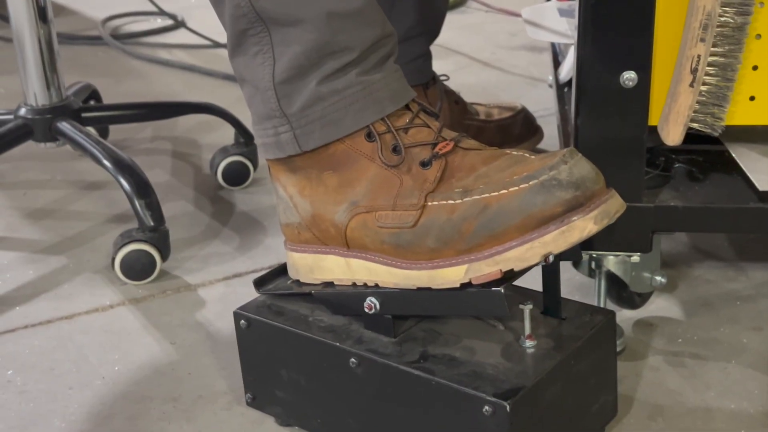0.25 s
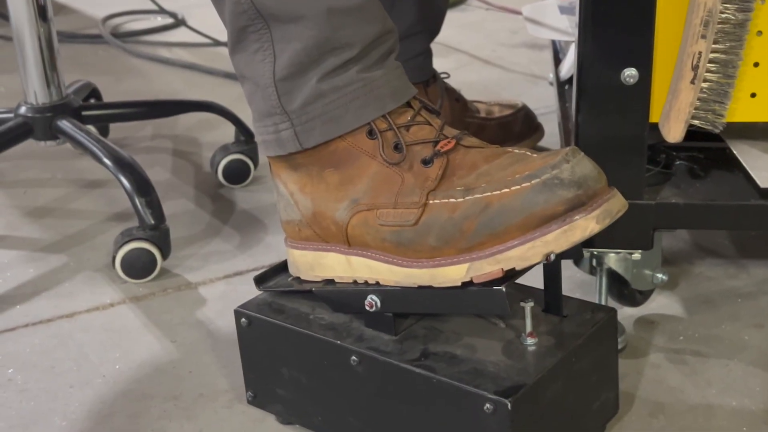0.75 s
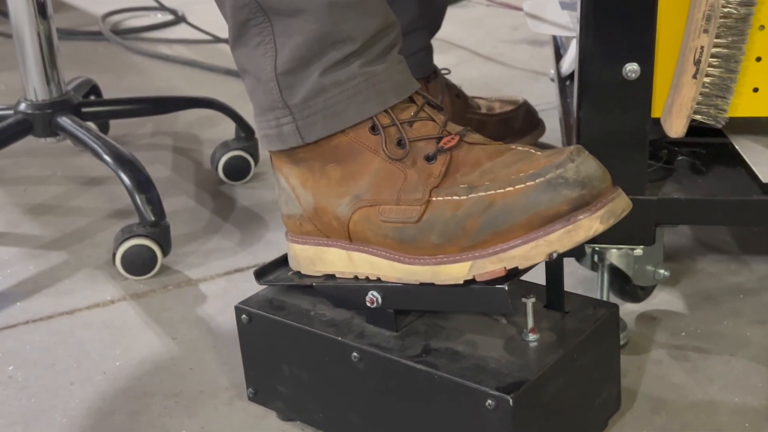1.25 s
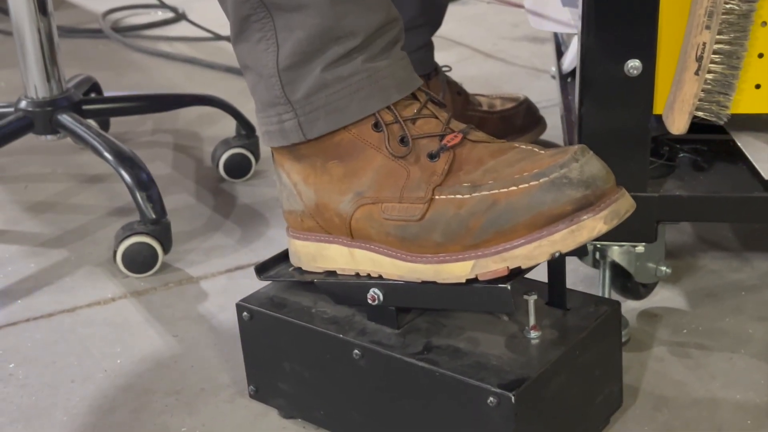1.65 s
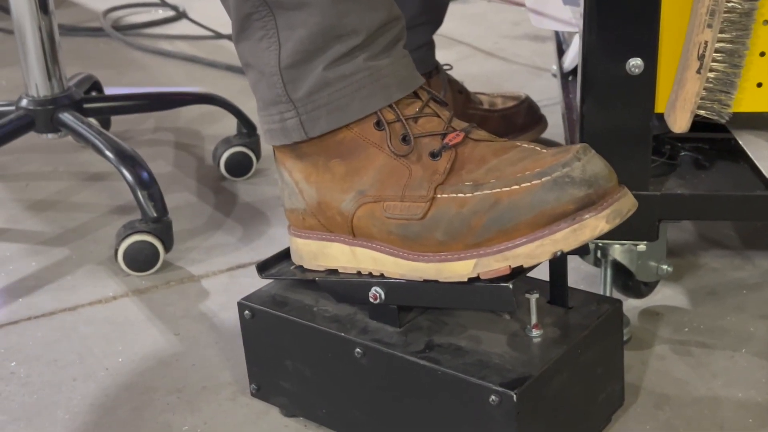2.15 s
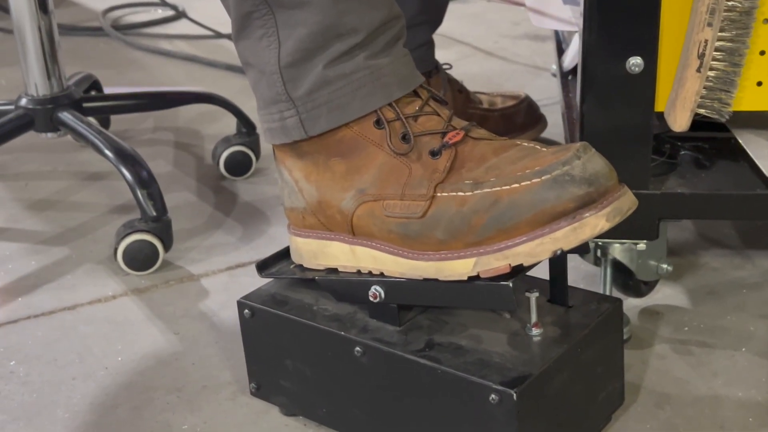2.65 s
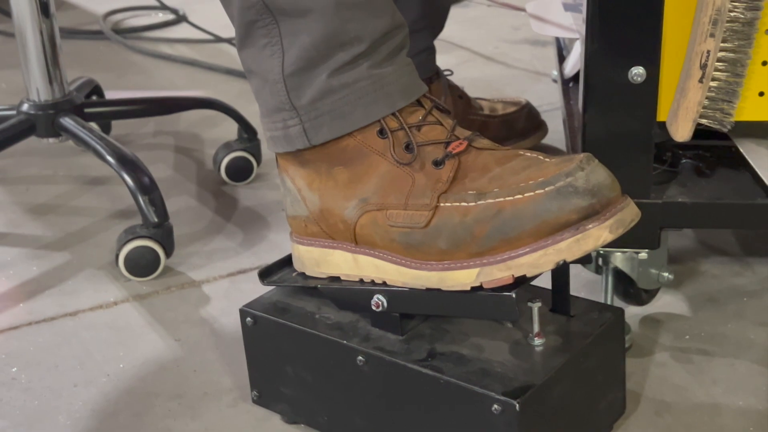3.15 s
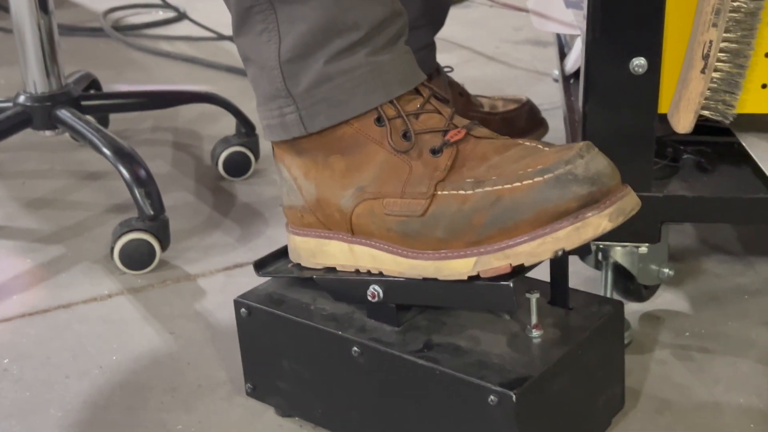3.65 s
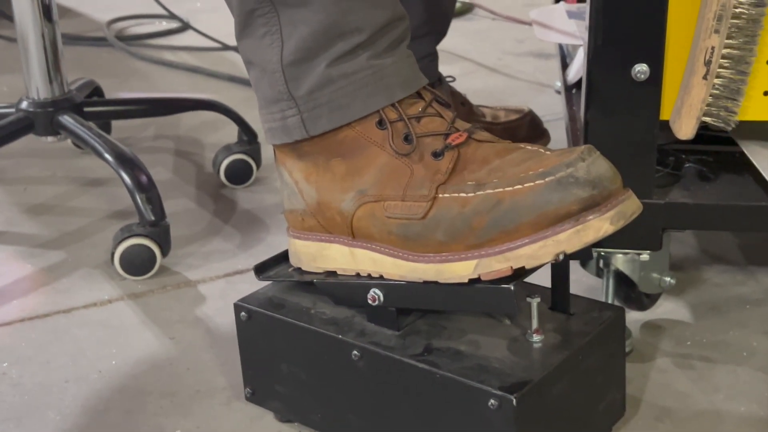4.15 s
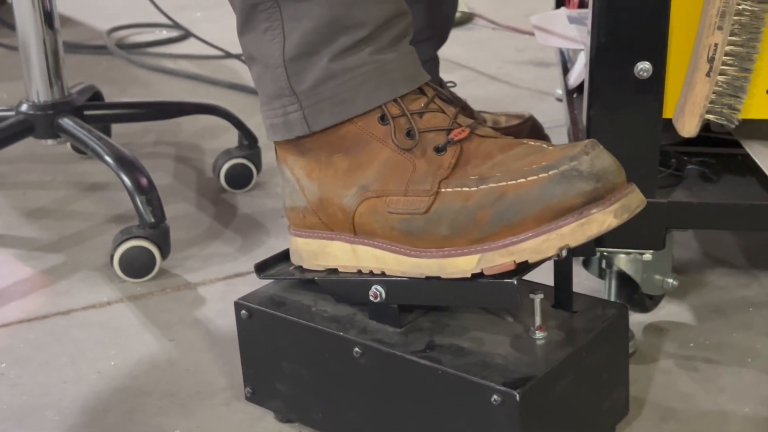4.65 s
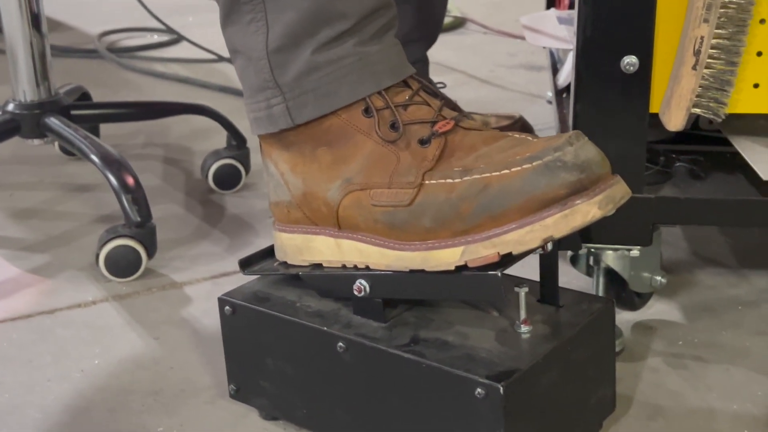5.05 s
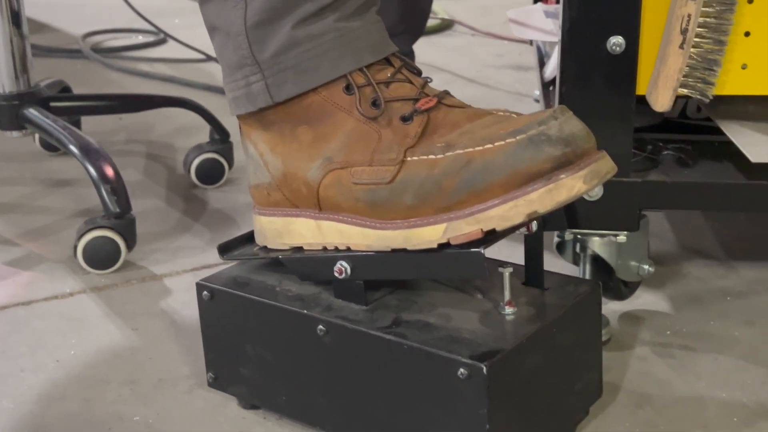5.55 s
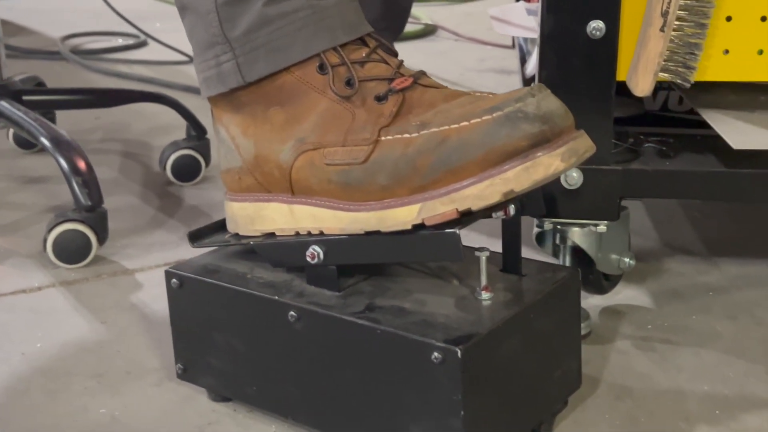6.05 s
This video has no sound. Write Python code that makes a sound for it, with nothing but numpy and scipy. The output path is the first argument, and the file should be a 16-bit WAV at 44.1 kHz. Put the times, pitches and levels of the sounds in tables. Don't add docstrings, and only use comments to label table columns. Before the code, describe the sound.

A welding arc snaps and pops through failed strikes, then catches and holds as a harsh, steady electric buzz over a fan hum.

```python
import sys
import numpy as np
from scipy import signal
from scipy.fft import rfft, irfft, next_fast_len
from scipy.io import wavfile
from scipy.ndimage import uniform_filter1d

SR = 44100
rng = np.random.default_rng(int(sys.argv[2]) if len(sys.argv) > 2 else 0)


def wav_record(signal):
    frames = np.transpose(np.atleast_2d(signal))
    bounded = np.clip(frames, -1, 1)
    quanta = np.round(bounded * 32767).astype(np.int16)
    wavfile.write(sys.argv[1], SR, quanta)


def elevation(decibels):
    levels = np.asarray(decibels, float)
    return 10 ** (levels / 20)


N = 278271
TIME = np.arange(N) / SR
EDGE_SHARE = 0.28
REPEAT_DB = -2
OFF_PLACE_DB = -7

# (frequency [Hz], left minus right [dB])
BALANCE = [(600, -3.5), (1500, 0), (2800, -5), (4200, 4), (7000, 12), (10000, 1.5)]


def level(x, db):
    return x * elevation(db) / np.sqrt(np.mean(x ** 2))


def at(table, hz):
    f, db = np.transpose(table)
    return np.interp(np.log(np.maximum(hz, 1)), np.log(f), db)


def shape(x, response):
    size = next_fast_len(N + SR // 2)
    hz = np.arange(size // 2 + 1) * SR / size
    return irfft(rfft(x, size) * response(hz), size)[..., :N]


def walk(rate):
    k = int(SR / rate)
    steps = np.repeat(rng.standard_normal(N // k + 1), k)
    return level(uniform_filter1d(uniform_filter1d(steps, k), k)[:N], 0)


def delayed(hz, ms):
    return np.exp(-2j * np.pi * hz * ms / 1000)


def fan(db=-38):
    # (frequency [Hz], level per Hz [dB])
    rush_colour = [(12, -58), (20, -21), (101, -8), (133, -4), (207, -10.5), (238, -6), (306, -17.5),
                   (491, -19.5), (597, -27.5), (725, -22), (1300, -28.5), (5690, -38.5), (7730, -36.5),
                   (11500, -56), (15700, -55), (16000, -85)]
    # (frequency [Hz], difference minus sum [dB])
    rush_width = [(25, -16), (60, -10), (110, -23), (200, -2), (380, -4.5), (700, 1), (2380, 3), (8120, -3),
                  (14000, 6), (15000, -18)]
    # (frequency [Hz], width [Hz], level [dB])
    tones = [(33, 4.8, -58), (63.1, 5.5, -49.5), (136.8, 3.94, -46), (186.2, 4.5, -42), (234.6, 2.01, -36),
             (279, 9.1, -50.5), (348, 8.7, -57), (697, 7.4, -56.5)]
    mid, side = rng.standard_normal((2, N))
    mid = shape(mid, lambda f: elevation(at(rush_colour, f)))
    side = shape(side, lambda f: elevation(at(rush_colour, f) + at(rush_width, f)))
    out = level(np.array([mid + side, mid - side]), db)
    for hz, width, tone_db in tones:
        turn = 2 * np.pi * np.cumsum(hz + 0.3105 * width * walk(6)) / SR
        swing = elevation(tone_db + 1 + 0.12 * width * walk(3.7))
        out = out + swing * np.sin(turn + np.array([[0], [0.3]]))
    return out


def paths(hz):
    # (delay [ms], left [dB], right [dB])
    echoes = [(.7, -9, -7), (1.4, -17, -18), (2.3, -13, -6), (5.8, -18, -18), (7.5, -19, -16),
              (11.1, -15, -9)]
    ms, *db = np.transpose(echoes)
    near = 1 + elevation(np.array(db)) @ np.exp(-2j * np.pi * np.outer(ms / 1000, hz))
    lean = elevation(at(BALANCE, hz) / 2)
    return near * [lean * delayed(hz, -0.3407), 1 / lean]


def coloured(pair, hz, echo_db=REPEAT_DB):
    # (frequency [Hz], level [dB])
    sum_colour = [(850, -22), (1150, -4.5), (1450, -9), (2100, 0.5), (3900, -8), (6300, -11), (8500, -16.5),
                  (11500, -21), (15700, -15.5), (16100, -80)]
    # (frequency [Hz], level [dB])
    difference_colour = [(400, -23), (850, -22), (1500, -15.5), (2200, -1), (4200, -10), (6900, -11.5),
                         (8500, -14.5), (12500, -21.5), (14300, -5.5), (15000, -43)]
    left, right = pair * (1 + elevation(echo_db) * delayed(hz, 1.753))
    mid = (left + right) * elevation(at(sum_colour, hz)) / 2
    return mid, (left - right) * elevation(at(difference_colour, hz)) / 2


def hiss(gate, side_db=-1, alike=0.16, echo_db=REPEAT_DB):
    # (frequency [Hz], level against the buzz colour [dB])
    hiss_colour = [(300, -17), (1000, 1.5), (2500, 1.5), (5000, 8.5), (8000, 18.5), (11000, 18.5),
                   (16000, 16.5)]
    own = rng.standard_normal((3, N)) * gate
    size = next_fast_len(N)
    hz = np.arange(size // 2 + 1) * SR / size
    near, *far = rfft(own, size)
    pair = alike * near * paths(hz) + np.sqrt(1 - alike ** 2) * np.array(far)
    mid, side = coloured(pair, hz, echo_db)
    side = elevation(side_db) * side
    return irfft(np.array([mid + side, mid - side]) * elevation(at(hiss_colour, hz)), size)[:, :N]


def tries():
    # (time [s], tries [count], peak [dB], spark over the pop [dB])
    dull = [(0.4448, 1, -14, -23), (0.4765, 1, -14, -30), (0.5292, 2, -13, -26.5), (0.6987, 1, -15, -27),
            (0.7899, 1, -13, -26), (0.9073, 1, -13.5, -28), (0.9417, 1, -13, -23), (0.9759, 2, -13, -25),
            (1.0282, 2, -13.5, -24), (1.1248, 1, -12, -25), (1.1945, 1, -14.5, -25), (1.244, 2, -13, -24),
            (1.3156, 1, -13, -25), (1.3335, 1, -12.5, -28), (1.4495, 1, -12.5, -43),
            (1.5855, 1, -12.5, -25)]
    # (time [s], tries [count], peak [dB], spark over the pop [dB])
    snaps = [
        (0.5952, 5, -10.5, -37),
        (0.7342, 2, -9, -30),
        (0.8385, 3, -10, -32),
        (1.1426, 1, -12, -27),
        (1.16, 1, -8, -30),
        (1.431, 1, -10, -23),
        (1.5165, 1, -13.5, -19),
    ]
    # (time [s], tries [count], peak [dB], spark over the pop [dB])
    catches = [
        (0.6817, 1, -18, -15.5),
        (0.7679, 1, -17, -15.5),
        (0.889, 1, -24, -17),
        (1.6135, 1, -23, -23),
    ]
    retry_s, retry_spark_db = 0.0173, -6
    runs = []
    for table, hz in ((dull, 1100), (snaps, 2730), (catches, 920)):
        for s, count, db, spark_db in table:
            for k in range(count):
                runs.append((s + k * retry_s, db, hz, spark_db + k * retry_spark_db))
    return sorted(runs)


def pop(hz, spark_db, grit):
    t = np.arange(300) / SR
    turn = (t - 0.0015) * (1170 + 0.42 * hz)

    def lobe(centre, width):
        return np.exp(-((turn - centre) / width) ** 2)

    gas = 0.8 * lobe(-0.4, 0.2) - 1.455 * lobe(0, 0.22) + 720 / hz * lobe(0.73, 0.38)
    ring = signal.butter(2, [0.78 * 14000, 1.3 * 14000], "band", fs=SR)
    grit = grit * elevation(-9) + 2 * signal.lfilter(*ring, grit)
    grit = grit * (t > 0.0007) * np.exp(-(t - 0.0007) / 0.0026)
    return gas + elevation(spark_db + 13) * grit


def pop_paths(hz):
    # (delay [ms], left [dB], right [dB])
    dull_echoes = [(2.24, -15, -1.5), (4.6, -11, -13)]
    ms, *db = np.transpose(dull_echoes)
    cup = 1 + elevation(-18) * delayed(hz, 0.72) / (1 + (hz / 1700) ** 4)
    echoes = elevation(np.array(db)) @ np.exp(-2j * np.pi * np.outer(ms / 1000, hz))
    near = 1 - echoes / (1 + (hz / 1960) ** 4)
    lean = elevation(at(BALANCE, hz) / 4)
    return cup * near * [lean * delayed(hz, 0.069), 1 / lean]


def workshop_tail(dry, room_db=-33, t60=0.34):
    tail = np.arange(SR // 2) / SR
    fade = np.exp(-np.log(1000) * tail / t60) * np.minimum(tail / 0.0017, 1)
    room = rng.standard_normal((2, len(tail))) * fade
    return elevation(room_db) * signal.fftconvolve(dry[None], room, axes=1)[:, :N]


def stutter():
    # (peak time [s], hiss [dB], rise [s])
    swells = [
        (0.447, -34, .005),
        (0.61, -31, 0.018),
        (0.684, -29.5, 0.009),
        (0.902, -29, 0.049),
        (1.094, -30, 0.077),
        (1.144, -31.5, 0.0059),
        (1.454, -31, 0.41),
        (1.518, -28, 0.0047),
        (1.6, -43, 0.044),
    ]
    swell_rise_db, fade_db_s = 33, 95
    since = TIME - swells[0][0]
    power = elevation(2 * (-40.5 + 8.5 * since)) * (since > 0)
    for s, db, rise in swells:
        before = -swell_rise_db * ((s - TIME) / max(rise, 0.001)) ** 2
        power = power + elevation(2 * (db + np.where(TIME < s, before, -fade_db_s * (TIME - s))))
    return np.sqrt(power) * (TIME < 1.6)


def strikes(tone):
    # (frequency [Hz], level [dB])
    pop_colour = [(250, -39), (450, 4.5), (750, -1), (1100, -0.5), (1400, -3.5), (2200, -0.5), (3200, 4),
                  (3900, -1), (6000, 6), (10000, 11), (13000, -8.5), (15000, -3), (16200, -19),
                  (16800, -40)]
    # (frequency [Hz], level against the burning hiss [dB])
    stutter_colour = [(4000, 2), (4800, 5), (5600, 1.5), (8200, -3), (9000, -29), (11700, -7), (13200, -7),
                      (14600, -1), (15700, -11), (16000, -20)]
    flare_db, flare_s = 4, 0.025
    dry, flare = np.zeros(N), np.ones(N)
    runs = tries()
    for (s, db, hz, spark_db), grit in zip(runs, rng.standard_normal((len(runs), 300))):
        i = int(s * SR)
        dry[i:i + 300] += elevation(db) * pop(hz, spark_db, grit)
        flare[i:] += elevation(flare_db + (spark_db + 11) / 2) * np.exp(-(TIME[i:] - s) / flare_s)
    wet = shape(dry, pop_paths) + workshop_tail(dry)
    pops = shape(wet, lambda f: elevation(at(pop_colour, f)))
    gate = stutter() * elevation(-2 + 0.8 * walk(60))
    thin = level(shape(tone, lambda f: 1 / (1 + (3500 / (f + 1)) ** 4)), -4)
    plasma = shape(level(hiss(1, echo_db=-9), 0), lambda f: elevation(at(stutter_colour, f)))
    return pops + gate * (flare * plasma + thin)


def click(hz, place, late):
    bench = elevation(-6) * delayed(hz, 2.45)
    floor = elevation(-2 + OFF_PLACE_DB * ((place - 2.4) / 0.8) ** 2) * delayed(hz, 1.72)
    scatter = late * (0.85 + 2 / (1 + (4000 / hz) ** 8))
    wave = 1 + bench + floor + scatter
    return wave / abs(wave)


def buzz(db=-44, rest_db=-58.0, rest_db_per_place=-0.6, strong_db=0.12, keep=0.878, side_db=-1, flutter_db=0.5):
    # (time [s], place along the seam [places])
    travel = [
        (1.6, 0),
        (3.2, .5),
        (6.31, 4.5),
    ]
    # (frequency [Hz], level [dB], best torch place [places], reach [places])
    legs = [(1035, -56, 0.0, 5), (1150, -49, 1.25, 3), (1265, -52, 2.38, 5), (1380, -55, 3.75, 1),
            (1495, -54, 3.62, 1.4), (1610, -52, 0.75, 3)]
    bench = [(1725, -49, 2.12, 2), (1840, -51, 0.12, 0.75), (1840, -45, 2.62, 2), (1840, -44, 3.12, 1),
             (1955, -51, 0.12, 5), (1955, -48, 0.88, 0.75), (2070, -44, 1.0, 2), (2185, -54, 3.88, 0.55),
             (2185, -44, 0.62, 1.4), (2300, -53, 3.38, 5), (2300, -49, 3.75, 0.4), (2415, -44, 1.62, 2),
             (2530, -51, 2.0, 3), (2645, -50, 0.62, 0.3), (2645, -43, 3.25, 1), (2760, -54, 3.88, 0.55),
             (2760, -45, 1.12, 1.4), (2875, -47, 4.12, 0.55), (2875, -46, 0.38, 1.4), (2990, -48, 1.0, 2),
             (2990, -45, 1.5, 1.4), (3105, -53, 2.12, 1.4), (3220, -50, 2.5, 3), (3220, -47, 3.0, 0.75),
             (3335, -50, 3.12, 0.4), (3335, -45, 1.0, 1), (3450, -51, 4.38, 0.3), (3450, -50, 3.38, 0.3),
             (3450, -45, 2.12, 1)]
    # (frequency [Hz], level [dB], best torch place [places], reach [places])
    clamped_piece = [(3565, -50, 1.88, 1), (3795, -46, 2.62, 0.75), (3910, -43, 3.88, 0.75), (4025, -47, 3.75, 1),
                     (4140, -52, 2.0, 1), (4370, -52, 3.38, 0.4), (4370, -48, 1.5, 0.75), (4485, -48, 3.62, 5),
                     (4485, -47, 0.75, 0.75), (4485, -42, 4.5, 0.75), (4600, -56, 0.0, 5), (4600, -42, 3.62, 0.55),
                     (4715, -55, 2.25, 3), (4945, -46, 4.38, 1), (5060, -48, 1.75, 5), (5060, -47, 0.62, 2),
                     (5060, -43, 4.25, 0.3), (5060, -42, 3.0, 0.4), (5175, -47, 2.38, 2), (5175, -46, 1.38, 0.75),
                     (5175, -43, 3.12, 0.3), (5290, -53, 1.38, 5), (5290, -50, 4.12, 0.3), (5290, -49, 3.25, 0.3),
                     (5520, -51, 1.75, 5), (5520, -48, 4.0, 0.3), (5520, -47, 0.75, 0.3), (5635, -48, 1.88, 5),
             (5635, -45, 0.62, 0.4), (5635, -44, 4.5, 0.4), (5750, -49, 4.25, 5), (5750, -45, 3.75, 0.55),
             (5865, -50, 2.5, 3), (6095, -50, 0.0, 5), (6095, -47, 0.38, 0.3), (6095, -46, 3.25, 0.3),
             (6210, -47, 0.25, 0.3), (6210, -41, 2.5, 2), (6210, -40, 4.5, 0.3), (6210, -37, 2.12, 0.55),
             (6325, -46, 2.88, 1.4), (6325, -43, 2.25, 0.3), (6325, -39, 0.38, 0.55),
             (6325, -39, 0.62, 0.4), (6440, -48, 4.38, 5), (6440, -46, 2.0, 1), (6440, -41, 3.88, 0.3),
             (6670, -48, 2.5, 3), (6670, -45, 3.88, 0.3)]
    # (frequency [Hz], level [dB], best torch place [places], reach
    torch_head = [(6785, -47, 4.25, 5), (6785, -43, 1.0, 0.3), (6785, -43, 2.38, 0.4), (6785, -38, 4.5, 0.3),
                  (6900, -49, 1.38, 1.4), (6900, -40, 2.62, 1.4), (7015, -48, 0.0, 5), (7015, -48, 3.62, 0.55),
                  (7015, -45, 0.25, 0.3), (7015, -41, 4.5, 0.3), (7245, -51, 4.25, 5), (7245, -47, 4.0, 0.3),
                  (7245, -46, 1.75, 0.3), (7360, -51, 0.25, 5), (7360, -48, 4.25, 0.55), (7475, -46, 2.5, 2),
                  (7475, -46, 4.12, 0.3), (7475, -43, 3.0, 0.3), (7475, -40, 2.12, 0.4), (7590, -51, 2.25, 3),
                  (7590, -49, 0.62, 0.3), (7590, -47, 2.5, 0.55),
                  (7820, -52, 2.25, 0.4), (7935, -47, 2.0, 3), (7935, -45, 1.5, 0.75), (7935, -45, 4.0, 0.3),
              (8050, -46, 1.75, 3), (8050, -44, 4.0, 0.3), (8050, -41, 1.62, 0.55), (8165, -47, 4.12, 0.3),
              (8165, -46, 2.5, 2), (8165, -44, 3.38, 0.3), (8165, -42, 2.25, 0.55), (8395, -50, 3.75, 3),
              (8510, -48, 2.62, 2), (8510, -45, 2.5, 0.55), (8510, -44, 3.62, 0.3), (8625, -50, 0.88, 0.3),
              (8625, -48, 2.88, 2), (8625, -45, 2.88, 0.3), (8740, -53, 4.25, 5)]
    arc_hz, place_step, last_place = 115.0, 0.25, 4.5
    order = np.arange(1, 146)
    hz = order * arc_hz
    bright = 1 / (1 + (3500 / hz) ** 2)
    edges = -1 - bright * elevation(-23) * np.exp(-2j * np.pi * order * EDGE_SHARE)
    phase = (TIME * arc_hz + 0.25 + 0.0006 * walk(30)) % 1
    place = np.clip(np.interp(TIME, *np.transpose(travel)), 0, last_place)
    lasting = 0.79 * rng.standard_normal((2, len(hz), 2))
    fresh = rng.standard_normal((2, len(hz), 2))
    line_hz, best_db, best, reach = np.transpose(legs + bench + clamped_piece + torch_head)
    strong = np.round(line_hz / arc_hz).astype(int) - 1
    out = 0
    for k in np.arange(0, last_place + 0.1, place_step):
        fresh = keep * fresh + np.sqrt(1 - keep ** 2) * rng.standard_normal((2, len(hz), 2))
        late = bright * ((lasting + fresh) @ [1, 1j])
        mid, side = coloured(edges * paths(hz) + late, hz)
        mid, side = mid * elevation(db), side * elevation(db + side_db)
        plain = abs(mid)
        size = abs(mid * np.minimum(1, elevation(rest_db + k * rest_db_per_place) / plain))
        line_db = best_db + OFF_PLACE_DB * ((k - best) / reach) ** 2
        size[strong] = elevation(-61)
        np.maximum.at(size, strong, elevation(line_db + strong_db))
        turn = click(hz, k, late[0]) * plain / mid
        mid = mid / plain * size * turn
        side = side * turn * np.sqrt(size / plain)
        spectrum = np.pad([mid + side, mid - side], ((0, 0), (1, 8046)))
        cycle = irfft(spectrum) * 16384 / np.sqrt(2)
        weight = np.cos(np.pi / 2 * np.minimum(abs(place - k) / place_step, 1)) ** 1.87
        out = out + weight * cycle[:, (phase * cycle.shape[1]).astype(int)]
    return out * elevation(flutter_db * (walk(14) + walk(70))), phase


def burning(tone, phase, hiss_db=-39.0, gate_db=4, edge_hz=3700):
    # (time [s], level [dB])
    burn = [(1.642, -28), (1.878, -29), (2.34, -29), (2.629, -31.5), (3.4, -32), (3.8, -32), (4.11, -33.5),
            (4.44, -32), (5.08, -31.5), (5.43, -29.5), (6.28, -29.5)]
    s, db = np.transpose(burn)
    swing_db = db - db.mean()
    after_weak = np.exp(-((phase - EDGE_SHARE) % 1) / 0.0096)
    flare = 1 + elevation(gate_db) * (np.exp(-phase / 0.1) + after_weak)
    arc = tone + level(hiss(flare * elevation(0.53 * walk(23))), hiss_db)
    low = shape(arc, lambda f: 1 / (1 + (f / edge_hz) ** 8))
    treble = (arc - low) * elevation(np.interp(TIME, s, -0.3 * swing_db))
    ignite = np.clip((TIME - 1.59) / 0.0093, 0, 1)
    return elevation(np.interp(TIME, s, swing_db)) * ignite * (low + treble)


def scene():
    tone, phase = buzz()
    return fan() + strikes(tone) + burning(tone, phase)


def roll_off(x):
    return signal.sosfilt(signal.butter(12, 17010, fs=SR, output="sos"), x)


def record(dry):
    # (frequency [Hz], level [dB])
    ports = [(8700, 0), (9300, -4), (10100, -22), (10900, 2), (11300, 3), (12900, 0.5), (13700, -11.5),
             (14600, -1)]
    heard = shape(dry, lambda f: elevation(at(ports, f)))
    return roll_off(heard)


dry = scene()
out = record(dry)
wav_record(out)
```